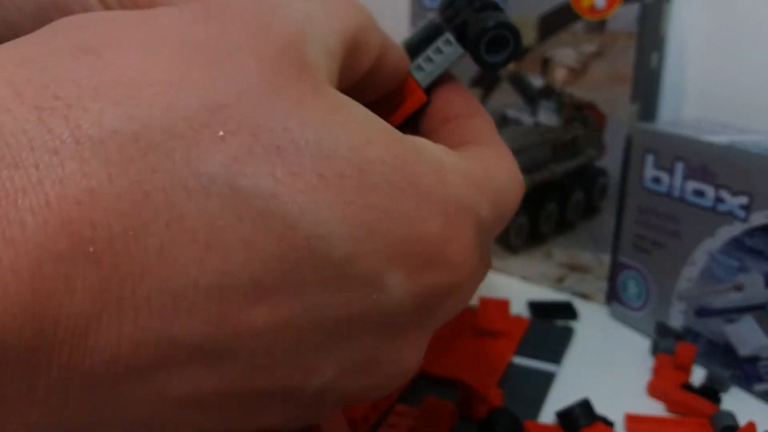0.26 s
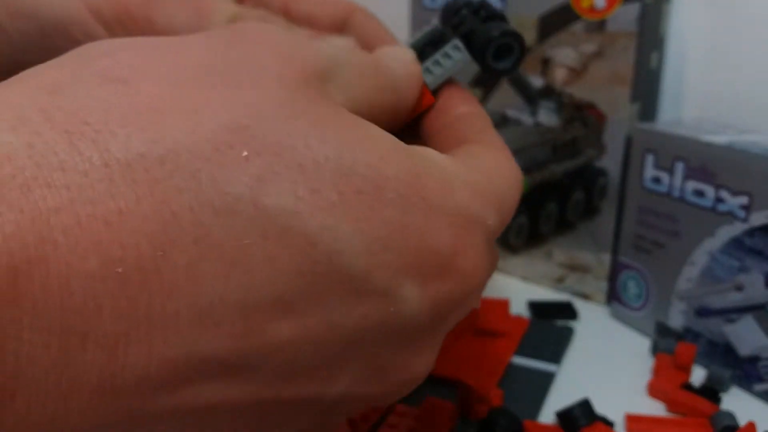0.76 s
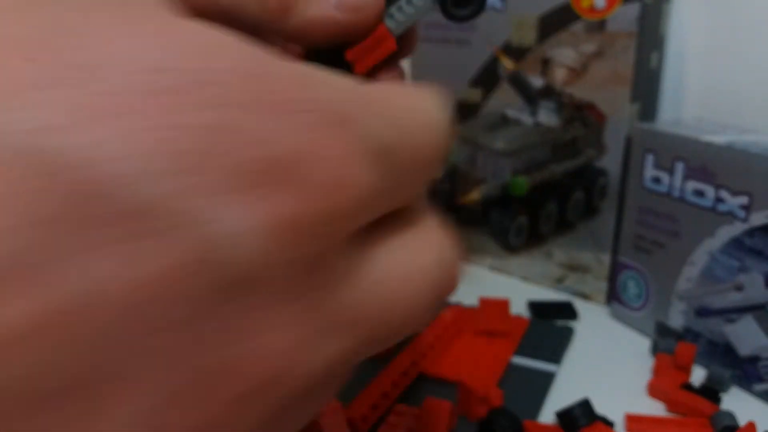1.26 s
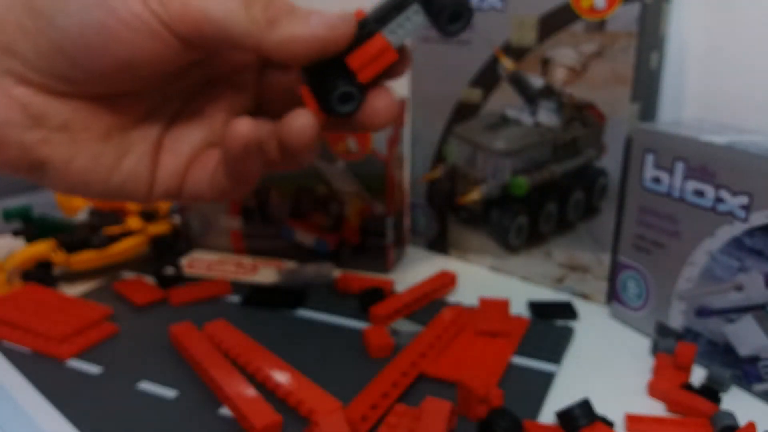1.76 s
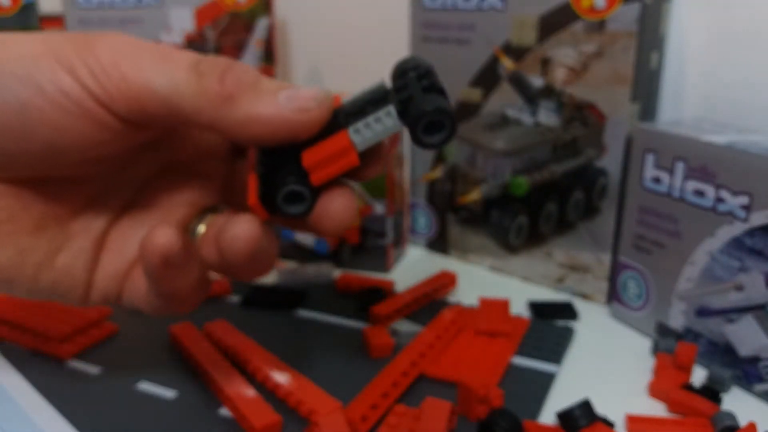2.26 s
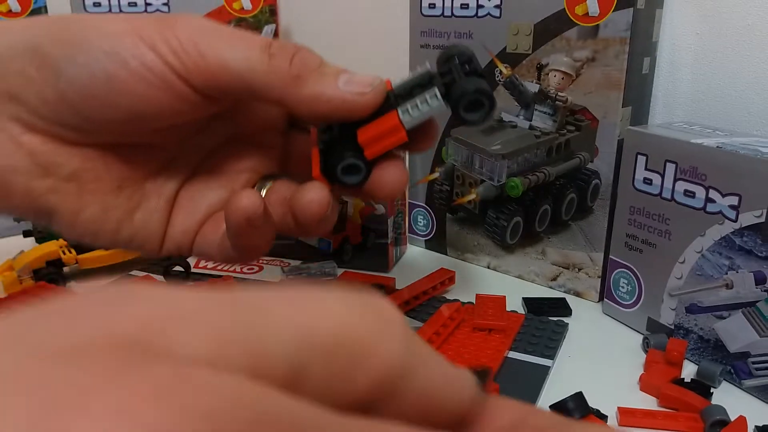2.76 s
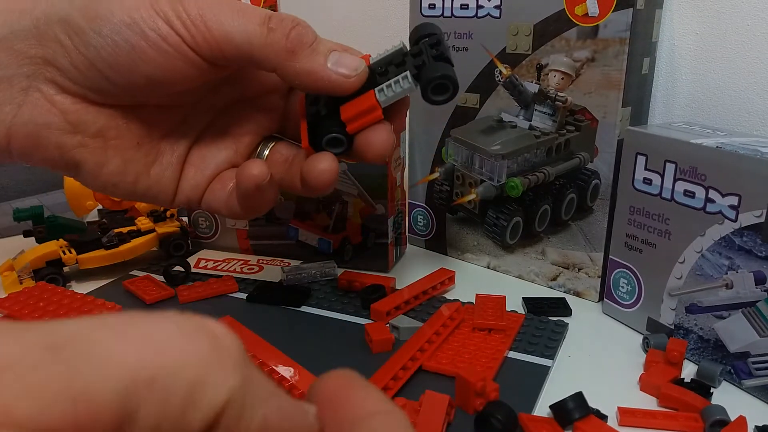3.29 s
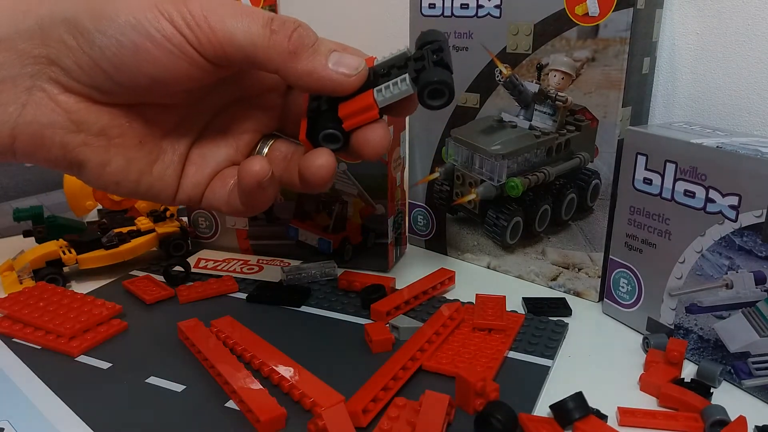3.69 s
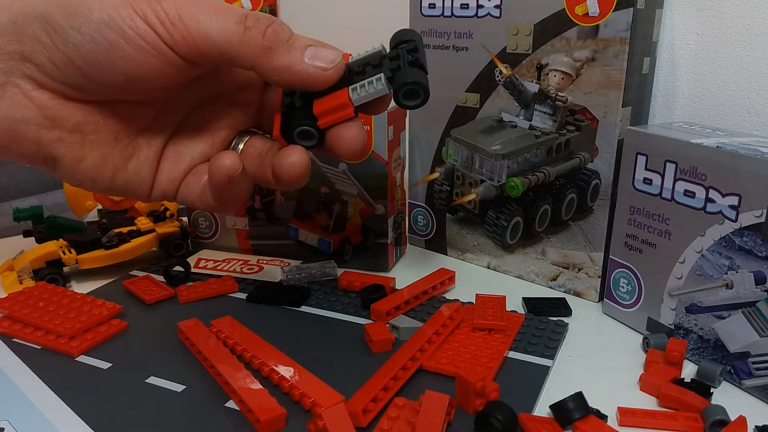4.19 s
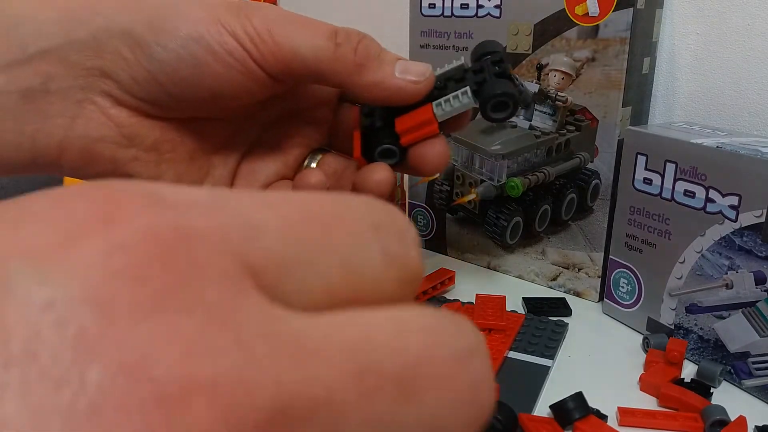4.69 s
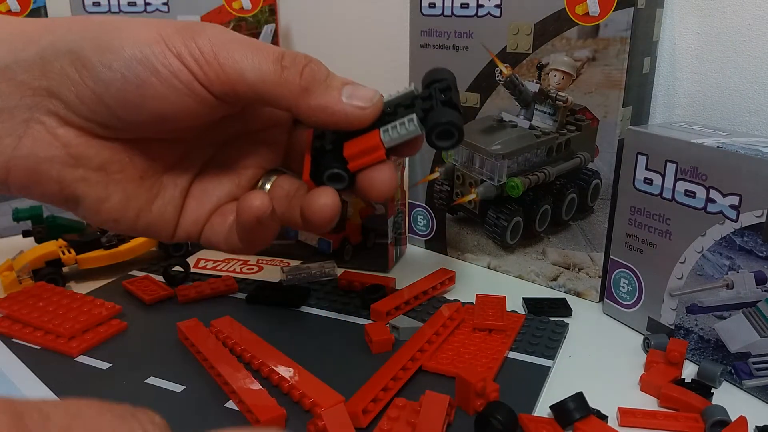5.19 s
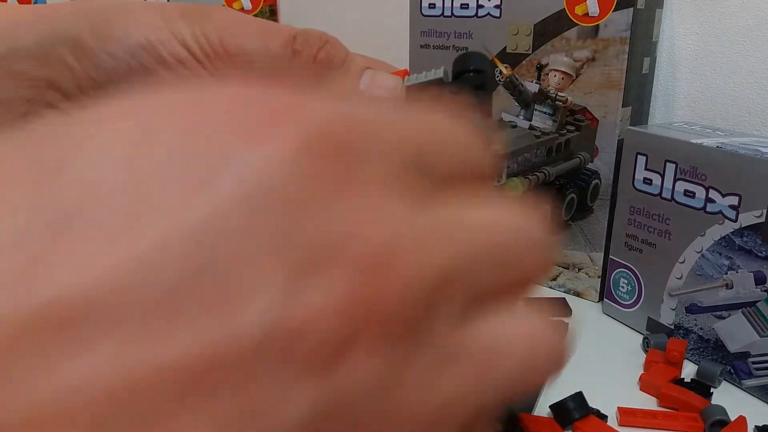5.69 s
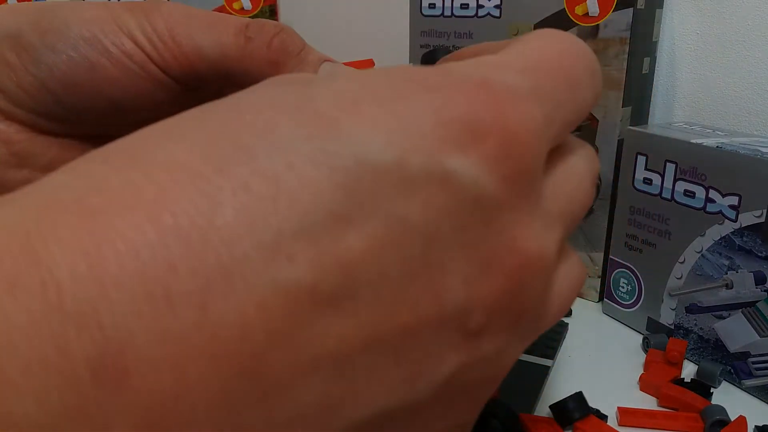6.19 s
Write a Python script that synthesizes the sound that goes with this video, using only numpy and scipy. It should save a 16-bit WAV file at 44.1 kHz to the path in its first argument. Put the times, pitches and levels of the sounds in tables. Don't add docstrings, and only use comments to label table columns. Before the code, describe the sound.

Close-up plastic toy bricks tick softly, get swept through in a pile, then clatter sharply on a tabletop in a small, quiet space.

```python
import sys
import numpy as np
from scipy import signal
from scipy.fft import rfft, irfft, next_fast_len
from scipy.io import wavfile
from scipy.ndimage import uniform_filter1d

SR = 44100
rng = np.random.default_rng(int(sys.argv[2]) if len(sys.argv) > 2 else 0)


def master(y):
    cut = np.clip(np.atleast_2d(y).T, -1, 1)
    pcm = np.round(cut * 32767)
    wavfile.write(sys.argv[1], SR, pcm.astype(np.int16))


def how_loud(loudness_db):
    steps = np.asarray(loudness_db, float) / 20
    return 10 ** steps


N = 284434
LENGTH = 6000


def band(x, lo_hz, hi_hz):
    return signal.sosfilt(signal.butter(2, [lo_hz, hi_hz], "band", fs=SR, output="sos"), x)


def fade(t60_s):
    return np.exp(-np.log(1000) * np.arange(LENGTH) / SR / t60_s)


def ring(modes, count, scatter_db, detune, damping):
    chance = rng.standard_normal((count, len(modes), 2))
    t = np.arange(LENGTH) / SR
    out = 0
    for k, (hz, db, t60_s) in enumerate(modes):
        pitch_hz = hz * (1 + detune * chance[:, k, 1:])
        strength = how_loud(db + scatter_db * chance[:, k, :1])
        out = out + strength * np.sin(2 * np.pi * pitch_hz * t) * fade(t60_s * damping)
    return out


def peak(x, db):
    return x * how_loud(db)[:, None] / np.abs(x).max(axis=1, keepdims=True)


def convolve(a, b):
    size = next_fast_len(a.shape[-1] + b.shape[-1])
    return irfft(rfft(a, size) * rfft(b, size), size)[..., :a.shape[-1]]


def wobble(rate_hz):
    width = int(SR / rate_hz)
    x = uniform_filter1d(uniform_filter1d(rng.standard_normal(N), width), width)
    return x / x.std()


def place(start_s, hits):
    out = np.zeros(N + LENGTH)
    for start, hit in zip((start_s * SR).astype(int), hits):
        out[start:start + LENGTH] += hit
    return out[:N]


# (frequency [Hz], level [dB], t60 [s])
TABLE_MODES = [(140, -26.5, .12), (200, -3, 0.098), (314.5, 8, 0.077), (450, 2, .1), (570, 1, 0.07),
               (795, 6, 0.052)]


def contacts(events, bricks, studs, own_db, crack_db, first_touch, chatter_ms, low_hz):
    start_s, db, hz, treble_db = np.transpose(events)
    count = len(start_s)
    t = np.arange(LENGTH) / SR

    bounce_ms = chatter_ms * (3000 / hz[:, None]) ** 0.39
    bounces = rng.standard_normal((count, LENGTH)) * (rng.random((count, LENGTH)) < .4)
    force = .4 * bounces * np.exp(-1000 * t / bounce_ms)
    force[:, 0] = first_touch

    own = how_loud(own_db) * np.sin(2 * np.pi * hz[:, None] * t) * fade(.007)
    body = convolve(force, own + ring(bricks, count, 1.1, .04, 0.72))
    body = body + how_loud(crack_db) * band(force, 1100, 4500)
    body = np.array([b + how_loud(-6.0) * band(b, f / 1.39, f * 1.6) for b, f in zip(body, hz)])
    body = band(band(body, low_hz, 7600), 210, 8400)

    stud_ring = convolve(force, ring(studs, count, 2.5, 0.0034, 0.75))
    treble = band(stud_ring + force, 7500, 22000)
    thump = ring(TABLE_MODES, count, 3, .03, .6)
    hits = peak(body, db - 1.0) + peak(treble, db + treble_db + 5.5) + peak(thump, db - 35.5)
    return place(start_s + .0006, hits)


# (time [s], peak level [dB], loudest ring [Hz], treble
# level [dB])
TUMBLE = [(3.5444, -21.5, 3000, -11.5), (3.5518, -12, 6010, -10), (3.5574, -20.5, 1280, -7.5),
          (3.6496, -14.5,  1850, -28), (3.6554, -10.5, 2420, -22.5), (3.683, -21.5, 2600, -10.5),
          (3.7014, -24.5, 1980, -11), (3.7074, -30.5, 1350, -11), (3.7204, -25, 6000, -18),
          (3.7304, -23, 2060, -14), (3.7414, -23, 1820, -18), (3.7474, -26, 2350, -24),
          (3.7624, -26.5, 2430, -19), (3.7838, -28.5, 1850, -14), (3.7948, -29.5, 1850, -0.5),
          (3.7995, -22.5, 1980, -13.5), (3.8262, -29.5, 2220, -14), (4.4737, -13.5, 2330, -16.5),
          (4.4867, -7.5, 2410, -17.5), (4.5296, -17.5, 5700, -17.5), (4.5354, -19.5, 3500, -40.5),
          (4.5585, -12.5, 1920, -11.5), (4.584, -32, 1930, -8), (4.5915, -26.5, 2050, -9),
          (4.5964, -24.5, 2740, -36.5), (4.6149, -24.5, 2000, -18),
          (4.1055, -38.5, 1850, -25), (4.1153, -33.5, 2700, -20), (4.1282, -35.5, 2000, -36),
          (4.2122, -45, 1824, -36.5), (5.4329, -34, 3340, -3.5), (5.4371, -29.5, 6360, -14),
          (5.449, -35, 1520, -31)]
# (frequency [Hz], level [dB], t60 [s])
LONG_BRICKS = [(850, -12, 0.0122), (1280, -8.5, 0.047), (1850, 3, 0.012), (2350, -8.5, .016),
               (2800, 8.5, 0.0023), (3486, 1.5, 0.0089), (4100, -0.5, 0.0082), (4710, 3, .008),
               (5400, -8.5, .006), (5810, -2, .014), (6950, -19.5, 0.0028)]
# (frequency [Hz], level
# [dB], t60 [s])
LONG_TREBLE = [(11370, -23.5, 0.026), (15500, -12, 0.0011)]


def tumble():
    return contacts(TUMBLE, LONG_BRICKS, LONG_TREBLE, own_db=-0.5, crack_db=14.8,
                    first_touch=.8, chatter_ms=3.98, low_hz=744)


# (frequency [Hz], level [dB], t60 [s])
SMALL_BRICKS = [(1000, -0.5, 0.011), (1730, -15.5, 0.0062), (2105, -2, 0.013), (2830, -6, 0.011),
                (3500, -1.5, 0.0076), (4300, -9, 0.019), (4800, -11.5, 0.011), (5600, -5, 0.0073),
                (6535, -4, 0.025), (6670, -37, 0.0029)]
# (frequency [Hz], level
# [dB], t60 [s])
SMALL_TREBLE = [(11300, -22, 0.00977), (15470, 0.5, 0.00078)]
# (time [s], peak level [dB], loudest ring [Hz], treble level [dB])
SWEEP = [(2.1454, -43, 1680, -27), (2.149, -26, 4360, -26), (2.159, -23.5, 6230, -23),
         (2.2124, -46, 1970, -23), (2.2243, -27.5, 6400, -18), (2.2444, -28, 3300, -30),
         (2.2553, -31, 2110, -24), (2.2588, -25, 3500, -7), (2.2634, -17.5, 4800, -18),
         (2.2704, -25.5, 3200, -31.5), (2.3044, -43, 1600, -33.5), (2.3181, -25, 5900, -26),
         (2.3224, -27, 3600, -38), (2.3304, -35.5, 2150, -34.5), (2.3454, -32, 6000, -28),
         (2.3524, -28, 5400, -26), (2.3584, -29, 5580, -15), (2.3834, -40, 1890, -7),
         (2.4079, -23.5, 1780, -30), (2.4284, -46, 1660, -36), (2.4374, -56, 6200, -17),
         (2.4438, -27.5, 6100, -22), (2.4564, -31, 6270, -29.5), (2.4634, -40, 3320, -21),
         (2.4798, -26, 3580, -15), (2.4967, -30, 3500, -24), (2.5234, -42, 2090, -29)]


def sweep():
    return contacts(SWEEP, SMALL_BRICKS, SMALL_TREBLE, own_db=-0.58, crack_db=4.6,
                    first_touch=1.5, chatter_ms=4.55, low_hz=1000)


# (time [s], peak level [dB], loudest ring [Hz], treble level [dB])
FINGERS = [(0.0763, -48.5, 3260, -36), (0.2094, -53, 2070, -31), (0.4246, -50.5, 2720, -19),
           (0.7994, -57, 5900, -15), (0.8131, -58, 1610, -1), (0.8257, -57, 3920, -12),
           (0.8327, -52.5, 3800, -7), (0.8947, -52.5, 3040, -26), (0.9084, -49.5, 2420, -9),
           (0.9462, -48.5, 2830, -30), (1.003, -56, 2650, -40), (1.043, -53, 3180, -28),
           (1.172, -52, 3800, -14), (1.1978, -31, 4300, -29), (1.2294, -47, 2400, -16),
           (1.2574, -58, 3190, -32), (1.347, -55, 2000, -36), (5.2759, -31, 3500, -24),
           (5.2826, -47, 2320, -28), (5.3532, -60.5, 2730, -29), (5.8957, -40, 6300, -25),
           (5.9005, -44, 2980, -18), (5.9767, -51.5, 5200, -17), (6.0566, -53, 6000, -18.5),
           (6.359, -56.5, 2500, -30), (6.4048, -36.5, 4980, -12.5)]


def fingers():
    return contacts(FINGERS, SMALL_BRICKS, SMALL_TREBLE, own_db=-0.86, crack_db=27,
                    first_touch=0.18, chatter_ms=3.95, low_hz=1570)


# (time [s], peak level [dB])
KNOCKS = [(2.146, -45), (2.15, -64), (2.271, -54), (2.305, -35), (2.331, -42), (2.346, -43), (2.438, -50),
          (2.464, -59), (2.524, -51), (3.545, -28.5), (3.5524, -19), (3.558, -31.5), (3.65, -28.5),
          (3.656, -29.5), (3.731, -40), (3.763, -39), (4.129, -70), (4.474, -35.5), (4.487, -36),
          (4.53, -34), (4.585, -40), (4.6155, -43.5), (5.283, -45.5), (5.352, -45), (5.45, -44)]


def knocks():
    start_s, db = np.transpose(KNOCKS)
    return place(start_s, peak(ring(TABLE_MODES, len(start_s), 3, .03, 0.41), db))


# (start [s], fastest [s], end [s], chatter level [dB], table rumble level [dB])
SLIDES = [(0.812, 0.838, .86, -63, -16), (0.893, 0.917, .935, -56.5, -17), (1.152, 1.195, 1.21, -60.5, -26),
          (1.2, 1.225, 1.322, -60.5, -16), (1.285, 1.36, 1.84, -75.5, -12),
          (2.143, 2.17, 2.464, -53.5, -5.5), (2.241, 2.256, 2.314, -38, -15),
          (2.282, 2.313, 2.425, -47, -3), (2.372, 2.442, 2.54, -51, -5.5), (3.68, 3.838, 3.86, -43, -11.5),
          (4.087, 4.109, 4.17, -52, 0), (4.56, 4.632, 4.545, -52, -15), (5.43, 5.433, 5.52, -56, 2)]


def slides():
    ends_db, treble_db = -11.5, -20.5
    unevenness = how_loud(1.1 * rng.exponential(size=N) + 2.9 * wobble(130))
    grains = rng.standard_normal(N) * (rng.random(N) < .06) * unevenness

    chatter = convolve(grains, ring([*LONG_BRICKS, *SMALL_BRICKS], 1, 0, 0, 1)[0])
    scrape = band(grains, 770, 10000) / grains.std() * 2
    chatter = chatter / chatter.std() + how_loud(-5.0) * scrape
    chatter = band(band(chatter, 800, 6800), 490, 7800)
    rumble = convolve(grains, ring(TABLE_MODES, 1, 0, 0, .6)[0])
    treble = band(band(grains, 8300, 17500), 7434, 17500)

    out, t = 0, np.arange(N) / SR
    for start, fastest, end, db, rumble_db in SLIDES:
        edge = np.clip(np.minimum((t - start) / 0.0015, (end - t) / 0.031), 0, 1)
        speed_db = db + np.interp(t, [start, fastest, end], [ends_db, 0, ends_db])
        for part, extra_db in ((chatter, 0), (rumble, rumble_db), (treble, treble_db)):
            out = out + edge * how_loud(speed_db + extra_db) * part / part.std()
    return out


# (time [s], peak level [dB], lowest table ring [Hz], t60 [s])
THUDS = [(2.148, -49.5, 237, 0.13), (3.555, -40.5, 200, 0.14), (3.652, -44, 200, 0.2),
         (4.082, -49.5, 200, 0.047), (4.096, -49, 200, 0.24), (4.126, -47.5, 200, 0.053),
         (4.475, -42, 229, 0.14), (4.487, -41.5, 213, 0.11), (5.291, -48, 210.4, 0.16),
         (5.351, -50, 200, .1), (5.453, -49, 372, 0.058)]


def thuds():
    start_s, db, hz, t60_s = np.transpose(THUDS)
    t = np.arange(LENGTH) / SR
    swell = 1 - np.exp(-t / 0.0013)
    tone = np.sin(2 * np.pi * hz[:, None] * t) * fade(t60_s[:, None])
    return place(start_s, peak(tone * swell, db))


# (frequency [Hz], t60 [s])
CORNER = [(150, .2), (700, 0.21), (2000, 0.17), (5000, 0.19), (12000, 0.032)]


def corner(x):
    hz, t60_s = np.transpose(CORNER)
    echo = 0
    for f in 125 * 2 ** np.arange(7.):
        top_hz = min(f * 2 ** .5 * (1 + (f > 7000)), 18000)
        octave = band(rng.standard_normal(LENGTH), f / 2 ** .5, top_hz)
        echo = echo + octave * fade(np.interp(np.log(f), np.log(hz), t60_s))

    tone = rfft(echo)
    size = np.abs(tone)
    flatten = (uniform_filter1d(size, size=60) / size) ** .85
    echo = irfft(tone * flatten, LENGTH) * np.hanning(2 * LENGTH)[LENGTH:]
    echo = np.concatenate([np.zeros(int(.002 * SR)), echo])
    return how_loud(-10) * convolve(x, echo / np.sqrt(np.sum(echo ** 2)))


# (frequency [Hz], density [dB per Hz])
HISS = [(20, -16.5), (45, -14), (80, 0), (125, -3), (196, -2), (240, -4), (444, -6.5), (819, -9.5),
        (1090, -10.5), (2620, -14), (4500, -20.5), (7590, -30), (15600, -21), (16500, -23)]
# (frequency [Hz], rms level [dB])
HUM = [(100, -69.5), (200, -82)]


def floor():
    hz, db = np.transpose(HISS)
    bins_hz = np.arange(N // 2 + 1) * SR / N + 1
    colour = how_loud(np.interp(np.log(bins_hz), np.log(hz), db))
    hiss = irfft(rfft(rng.standard_normal(N)) * colour, N)

    t, drift_rad = np.arange(N) / SR, .3 * wobble(12)
    hum = 0
    for f, rms_db in HUM:
        level = 2 ** .5 * how_loud(rms_db + 0.37 * wobble(14))
        hum = hum + level * np.sin(2 * np.pi * f * t + drift_rad * f / 100)
    return how_loud(-66.5) * hiss / hiss.std() + hum


def scene():
    bricks = tumble() + sweep() + fingers() + knocks() + slides() + thuds()
    bricks = band(band(bricks + corner(bricks), 130, 19000), 115, 19000)
    return (bricks + floor())[None]


def band_limit(x):
    return signal.sosfilt(signal.butter(12, 17130, fs=SR, output="sos"), x)


def record(dry):
    steep_cut = signal.ellip(8, .2, 42, 15720, fs=SR, output="sos")
    mix = signal.sosfilt(steep_cut, dry) - .0004
    return band_limit(mix)


dry = scene()
out = record(dry)
master(out)
```